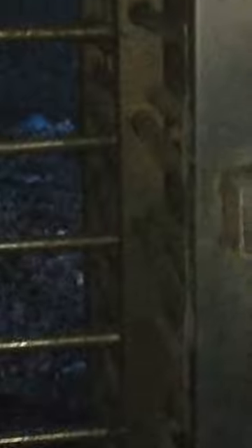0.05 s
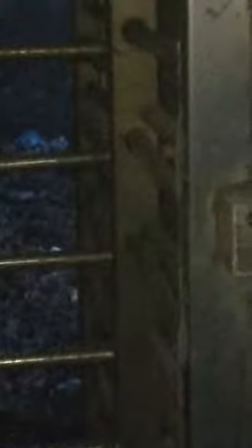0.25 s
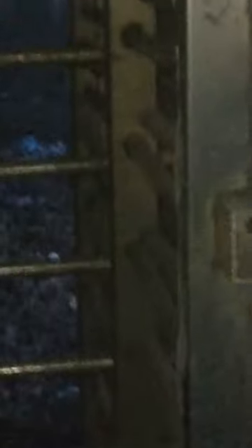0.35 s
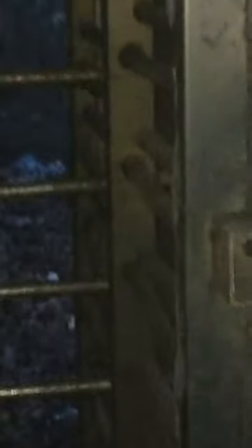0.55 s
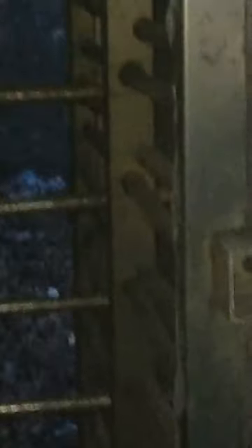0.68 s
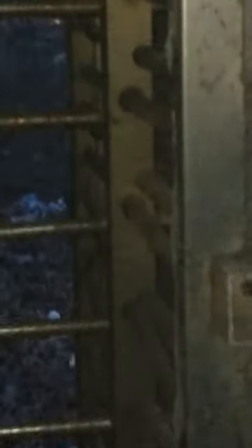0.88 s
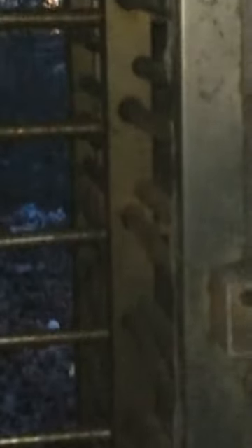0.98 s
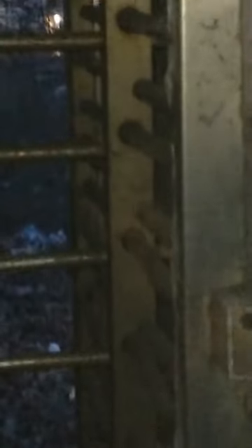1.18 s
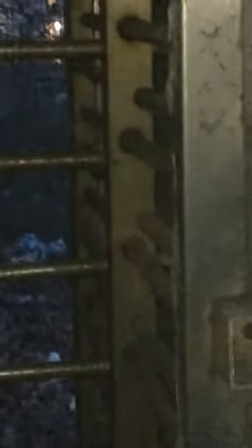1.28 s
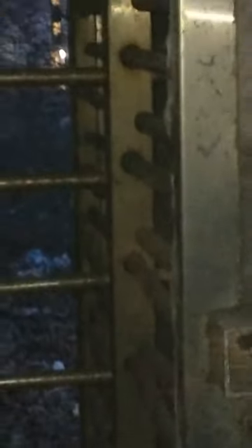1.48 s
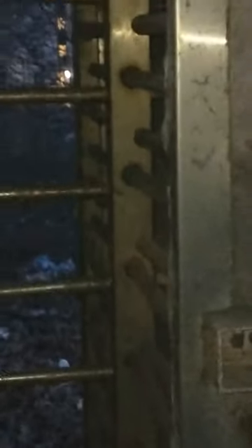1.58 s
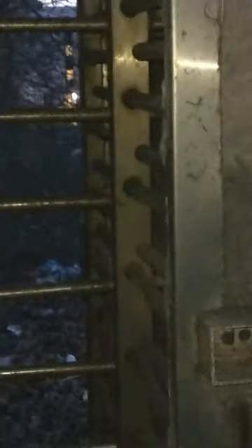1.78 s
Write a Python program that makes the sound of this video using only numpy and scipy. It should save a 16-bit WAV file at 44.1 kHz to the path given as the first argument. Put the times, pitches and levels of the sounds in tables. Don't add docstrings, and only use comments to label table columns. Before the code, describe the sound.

A steel turnstile locks with a sharp, ringing clunk and short low boom, its loose latch rattling just afterward; later a small catch clicks and ticks. Outdoors, faint traffic, close handheld microphone with soft bumps.

```python
import sys
import numpy as np
from scipy import signal
from scipy.fft import rfft, irfft
from scipy.io import wavfile

SR = 44100
rng = np.random.default_rng(int(sys.argv[2]) if len(sys.argv) > 2 else 0)


def decibels_to_gain(level_db):
    exponent = np.asarray(level_db, float) / 20
    return 10 ** exponent


def generate_wav(sig):
    pcm = np.round(np.clip(np.atleast_2d(sig).T, -1, 1) * 32767).astype(np.int16)
    wavfile.write(sys.argv[1], SR, pcm)


N = 81585
SEAT_S = 0.4470
FIRM_SHARE, HARD_FIRM_SHARE = 0.7, 0.92


def rms_one(x):
    return x / np.sqrt(np.mean(x ** 2) + 1e-20)


def drift(rate_hz):
    r = np.exp(-80 * np.pi * rate_hz / SR)
    noise = rng.standard_normal(N // 40 + 2002)
    slow = signal.lfilter([1], [1, -2 * r, r * r], noise)[2000:]
    return np.interp(np.arange(N) / 40, np.arange(len(slow)), rms_one(slow))


def ring(x, hz, t60_s):
    r = decibels_to_gain(-60 / (t60_s * SR))
    w = 2 * np.pi * hz / SR
    return signal.lfilter([0, np.sin(w)], [1, -2 * r * np.cos(w), r * r], x + 1e-18)


def colour(x, spectrum):
    hz, db = np.transpose(spectrum)
    log_hz = np.log(np.fft.rfftfreq(N, 1 / SR) + 1)
    gain = decibels_to_gain(np.interp(log_hz, np.log(hz), db, left=-60, right=-60))
    return irfft(rfft(x) * rms_one(gain), N)


def band(x, order, low_hz, high_hz):
    return signal.sosfilt(signal.butter(order, [low_hz, high_hz], "band", fs=SR, output="sos"), x)


def scuffs(s, db, t60_s, firm=0):
    clicks = np.zeros(N)
    clicks[(np.asarray(s) * SR).astype(int)] = decibels_to_gain(db)
    r = decibels_to_gain(-120 / (t60_s * SR))
    swell = signal.lfilter([2 * (1 - r) ** 1.5], [1, -2 * r, r * r], clicks + 1e-18)
    spray = swell * rng.standard_normal(N)
    return np.sqrt(1 - firm) * spray + np.sqrt(firm) * clicks


def struck(s, db, modes, scatter_db, scuff_t60_s, low_db=0, firm=0):
    out = np.zeros(N)
    for k, (hz, level_db, t60_s) in enumerate(modes):
        chance_db = scatter_db * rng.standard_normal(len(s))
        push_db = db + level_db + low_db * (hz < 2800) + chance_db
        push = scuffs(s, push_db, scuff_t60_s, firm)
        out = out + (-1) ** k * ring(push, hz, t60_s)
    return out


def far_traffic():
    # (frequency [Hz], level [dB per Hz])
    hum_spectrum = [(30, -31.5), (60, 2.5), (105, -2.5), (714, -11.5), (1130, -11.5), (1650, -13.5),
                    (2200, -21.5), (4000, -31.5), (7750, -35.5), (8400, -56.5)]
    # (frequency [Hz], width [Hz], level [dB])
    housing_modes = [(990, 104, 7), (1125.6, 93, 7.5), (1559, 90, 2.5), (317, 30, -8.5)]
    hum = colour(rng.standard_normal(N), hum_spectrum)
    housed = hum
    for k, (hz, width_hz, db) in enumerate(housing_modes):
        resonance = ring(hum, hz, 4.17 / width_hz) * 2 * np.pi * width_hz / SR
        housed = housed + (-1) ** k * decibels_to_gain(db + 1.5 * drift(10.0)) * resonance
    return decibels_to_gain(-60.5 + 0.35 * drift(14.0)) * rms_one(housed)


def passing_vehicle():
    # (time [s], level [dB])
    vehicle_level = [(0, -58.5), (0.148, -56.5), (.3, -60), (0.549, -59.5), (.75, -63.5), (1.0, -65),
                     (1.3, -73.5), (1.6, -70.5), (1.85, -70)]
    # (frequency [Hz], level [dB per Hz])
    tyre_spectrum = [(120, -46), (200, -2.5), (550, -14.5), (1010, -4), (2150, -10.5), (2700, -24.5),
                     (4700, -24.5), (5100, -37.5), (7800, -39.5), (8400, -55)]
    s, db = np.transpose(vehicle_level)
    level_db = np.interp(np.arange(N) / SR, s, db) + 0.21 * drift(21.0)
    return decibels_to_gain(level_db) * colour(rng.standard_normal(N), tyre_spectrum)


def rumble():
    low = band(rng.standard_normal(N), 3, 58.7, 148.2)
    return decibels_to_gain(-68.5 + 4 * drift(7.9)) * rms_one(low)


def knocks():
    # (time [s], peak level [dB], pitch [Hz])
    knock_events = [(.0800, -42.5, 452), (0.0868, -42, 430), (.0805, -52, 1000), (.0805, -50, 1950),
                    (.176, -76, 784), (.333, -46.5, 990), (0.412, -49, 448), (.550, -37.5, 375),
                    (0.696, -46.5, 310), (.468, -35, 292.3), (0.475, -43, 417), (.498, -39.5, 312),
                    (.572, -43, 270), (.603, -46, 293), (.630, -45.5, 330), (0.67, -45, 319),
                    (0.246, -43.5, 281)]
    return sum(ring(scuffs([s], db, 0.0082, FIRM_SHARE), hz, 11 / hz) for s, db, hz in knock_events)


def air_buffets():
    # (time of the crest [s], peak level [dB], pitch [Hz], length [cycles])
    buffet_events = [(0.1163, -37, 107, 0.61), (.178, -55.5, 110, 1.2), (0.2356, -37, 97, 0.86),
                     (0.252, -36.5, 151, 1.3), (0.284, -48.5, 81, 0.93), (0.314, -44.5, 83, 1.46),
                     (0.3541, -49.5, 101.7, 2.1), (0.379, -50.5, 100, 0.58), (0.405, -51.5, 109, 0.79),
                     (0.43, -40.5, 108, 1.03), (0.5385, -48, 94, 0.72), (0.5476, -42.5, 90, 0.53),
                     (0.572, -53, 101, 1), (0.508, -44, 95, .7), (0.605, -50.5, 84.5, 0.97),
                     (0.629, -54, 80, .7), (0.678, -46.5, 104, 0.59), (0.6948, -43, 86.7, 1.32),
                     (0.8202, -47, 76, 1.03), (0.887, -56.5, 130, 1.8), (0.9218, -39.5, 83, 0.73),
                     (0.936, -37.5, 102.6, 1.06), (.975, -77.5, 85, 1), (1.11, -49, 82, 1.08),
                     (1.179, -54.5, 83.2, 0.57), (1.209, -54.5, 95, 1.3), (1.26, -50, 90, 0.79),
                     (1.336, -57, 95, 0.59), (1.59, -51, 99, 0.91), (1.663, -46.5, 90, 0.69),
                     (1.693, -43, 110, 0.79), (1.8467, -43, 115, 0.99)]
    lag_cycles, edge_db = 0.26, -15.5
    t = np.arange(N) / SR
    out = np.zeros(N)
    for s, db, hz, cycles in buffet_events:
        turns = (t - s) * hz
        swell = decibels_to_gain(db) * np.exp(-((turns - lag_cycles) / cycles) ** 2)
        wave = np.cos(2 * np.pi * turns) + decibels_to_gain(edge_db) * np.cos(4 * np.pi * turns)
        out = out + swell * wave
    return out


def latch_rattles():
    # (time [s], peak level [dB], low body level [dB], bright scratch level [dB])
    rattle_events = [(0.1663, -60.5, 4.5, -8), (0.2481, -55, 6.5, 5), (0.353, -63, -5, 6),
                     (0.3673, -59.5, 0, 5), (0.4982, -51, -1, -1), (0.5189, -58, 1, -2),
                     (0.523, -57.5, -19, 2), (0.5659, -48.5, -1.5, -5.5), (0.5960, -51.5, 3, 6),
                     (0.603, -42, 3, -9.5), (0.614, -54, -3, 1), (0.6205, -44, -2, 0.5),
                     (0.6345, -48.5, 5.5, -13), (0.6690, -47, -2.5, -9), (0.6820, -56.5, 3.5, -6),
                     (.6860, -58, 8, 0), (0.6906, -49, -2.5, -2), (0.7144, -61, 2, -3),
                     (0.75, -56.5, -17, -3.5), (0.7746, -58.5, -13, -22), (1.3393, -63, -6, 6),
                     (1.3666, -56.5, -4, 0), (1.385, -57.5, -5, -3), (1.4076, -70, 3, -4),
                     (1.82, -64, -10, -9)]
    # (frequency [Hz], level [dB])
    latch_modes = [(800, -4.5), (1250, -2), (1600, -15), (2000, 2.5), (2400, -5.5), (2800, -7), (3200, -7),
                   (3600, -9.5), (4010, -3.5), (4420, -3.5), (4750, -10.5), (5460, -21), (5900, -16)]
    s, db, low_db, bright_db = np.transpose(rattle_events)
    modes = [(hz, level_db, 0.015) for hz, level_db in latch_modes]
    body = struck(s, db - 3.5, modes, 1.1, 0.02, low_db, FIRM_SHARE)
    scratch = band(scuffs(s, db + 14.5 + bright_db, 0.032), 2, 3000, 7600)
    return body + scratch


def clunk():
    # (time [s], strength [dB], brightness [dB])
    blow_contacts = [(.4378, -53, 7.5), (0.439, -39, 9), (.4430, -25, 11.5), (.4470, -20, 5.5),
                     (0.4496, -26.5, 1), (0.452, -25, -13.5), (0.454, -41, 2), (.4590, -30.5, -0.5),
                     (.4650, -40.5, 4), (.4730, -44, -7.5), (0.482, -48, 2), (0.496, -46.5, 1)]
    # (frequency [Hz], level [dB], t60 [s])
    frame_modes = [(786, -11, 0.066), (918, -14, 0.054), (1192, -9, 0.062), (1403, -4.5, 0.044),
                   (1757, -11.5, 0.065), (2148, -13.5, 0.048), (2700, -17, 0.04), (3105, -14, 0.034),
                   (3305, -12, 0.04), (4120, -10.5, 0.027), (4910, -18.5, 0.04), (5730, -27, 0.099),
                   (6900, -21, 0.053), (7210, -23.5, 0.05)]
    # (frequency [Hz], level [dB per Hz])
    crack_spectrum = [(210, -27.5), (350, -0.5), (1010, -2), (1380, -3.5), (2500, -7.5), (4100, -9.5),
                      (5810, -23), (6890, -14.5), (8000, -31), (10600, -57), (18000, -120)]
    scuff_t60_s, seat_db, low_lag_s = 0.025, -20.5, 0.002786
    s, db, bright_db = np.transpose(blow_contacts)
    modes = [(hz, level_db, min(t60_s, 0.08)) for hz, level_db, t60_s in frame_modes]
    low_modes = [m for m in modes if m[0] < 2800]
    high_modes = [m for m in modes if m[0] >= 2800]
    seat = struck([SEAT_S + low_lag_s], seat_db, low_modes, 0, 0.0096, 0, HARD_FIRM_SHARE)
    seat = seat + struck([SEAT_S], seat_db, high_modes, 0, 0.0096, 0, HARD_FIRM_SHARE)
    frame = struck(s, db - 16.5 + bright_db, modes, 0.9, scuff_t60_s, -bright_db)
    dull = colour(scuffs(s, db + 10.5, scuff_t60_s), crack_spectrum)
    sharp = colour(scuffs(s, db + 17.5 + bright_db, scuff_t60_s), crack_spectrum)
    sharp = np.diff(sharp, prepend=0)
    return frame + seat + dull + sharp


def post():
    # (frequency [Hz], level [dB], t60 [s], start time [s])
    post_modes = [(93.4, -25.5, 0.13, .4505), (156, -29, .12, .4535), (215, -39, 0.1, .4490),
                  (298, -33.5, 0.075, .4460), (330, -35, 0.066, .4430), (360, -41, 0.049, .4510),
                  (440, -32.5, 0.17, .4470)]
    boom = np.zeros(N)
    for hz, db, t60_s, s in post_modes:
        boom = boom + ring(scuffs([s], db, 0.0072, 0.99), hz, min(t60_s, 20 / hz))
    return band(boom, 2, 79, 500)


def wash():
    # (frequency [Hz], level [dB per Hz])
    wash_spectrum = [(150, -15), (250, -3.5), (400, -1), (723, -11), (1160, -7), (2490, -16), (4500, -32),
                     (5600, -35.5), (7040, -35), (8300, -47.5)]
    level_db, t60_s, rise_s = -44.5, 0.68, 0.0036
    t = np.maximum(np.arange(N) / SR - SEAT_S, 0)
    fade = decibels_to_gain(level_db - 60 * t / t60_s) * (1 - np.exp(-t / rise_s))
    return fade * colour(rng.standard_normal(N), wash_spectrum)


def catch_drop():
    # (time [s], level [dB])
    landings = [
        (1.339, -48),
        (1.3407, -47.5),
    ]
    # (frequency [Hz], level [dB], t60 [s])
    catch_modes = [(846, -9, .02), (1265, -2.5, 0.026), (1600, -20, 0.014), (1970, -5.5, 0.028),
                   (2410, -9, .015), (2830, -7, 0.0092), (3400, -4, 0.012), (3900, -4.5, 0.013),
                   (4400, -7, 0.0091), (6880, -24, 0.011)]
    s, db = np.transpose(landings)
    return struck(s, db, catch_modes, 0, 0.0081, 0, HARD_FIRM_SHARE)


def loose_part_ticks():
    # (time [s], peak level [dB])
    tick_events = [(1.517, -54.5), (1.5337, -59), (1.5624, -74), (1.6067, -55), (1.628, -68),
                   (1.7025, -54.5), (1.7305, -64.5)]
    # (frequency [Hz], level [dB])
    part_modes = [(2750, -10), (3350, -2.5), (3600, -2.5), (4050, -16), (4600, -15.5), (5600, -32),
                  (6500, -16.5), (7100, -18.5)]
    s, db = np.transpose(tick_events)
    modes = [(hz, level_db, 0.017) for hz, level_db in part_modes]
    return struck(s, db, modes, 0.75, 0.017, 0, HARD_FIRM_SHARE)


def scene():
    outdoors = far_traffic() + passing_vehicle() + rumble()
    handling = knocks() + air_buffets()
    locking = clunk() + post() + wash()
    loose_metal = latch_rattles() + catch_drop() + loose_part_ticks()
    return (outdoors + handling + locking + loose_metal)[None]


def roll_off(x):
    return signal.sosfilt(signal.butter(12, 8480, fs=SR, output="sos"), x)


def record(dry):
    top = 0.17
    rounded = top * np.tanh(dry / top)
    cut = signal.sosfilt(signal.cheby2(12, 60, 8900, fs=SR, output="sos"), rounded)
    mix = signal.sosfilt(signal.butter(2, 36, "high", fs=SR, output="sos"), cut)
    return roll_off(mix)


dry = scene()
out = record(dry)
generate_wav(out)
```